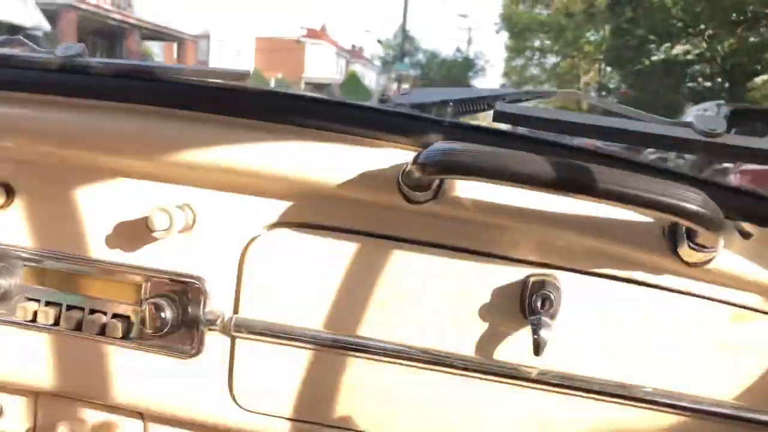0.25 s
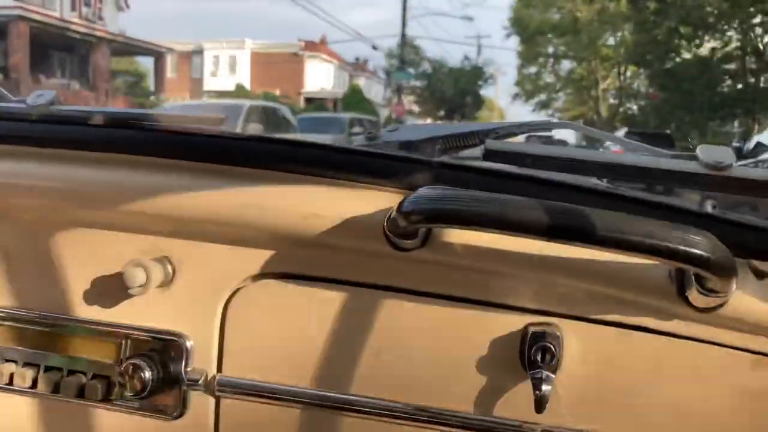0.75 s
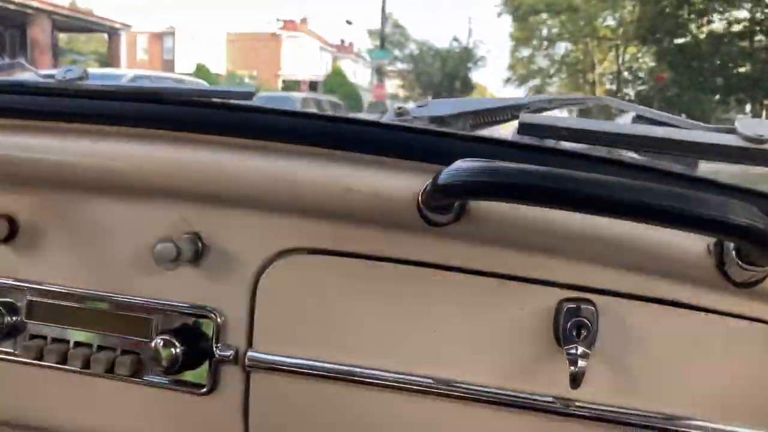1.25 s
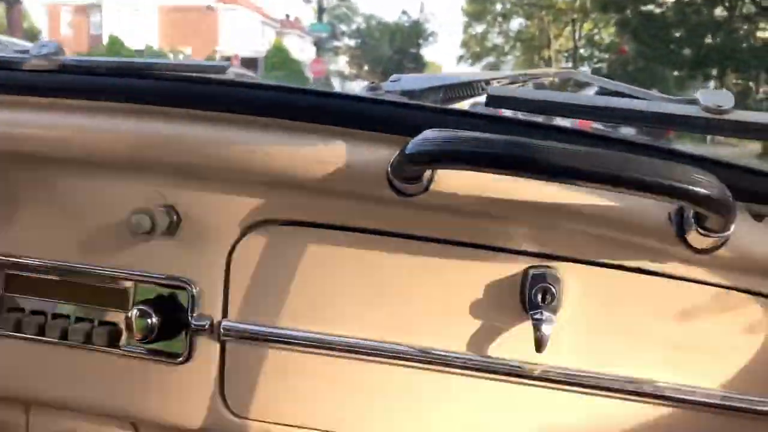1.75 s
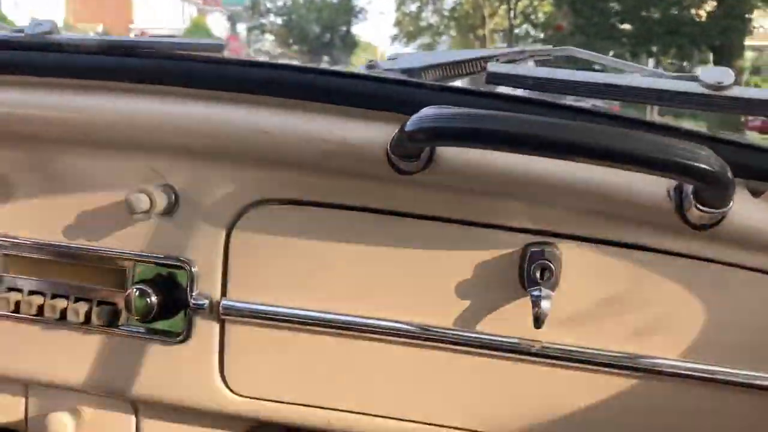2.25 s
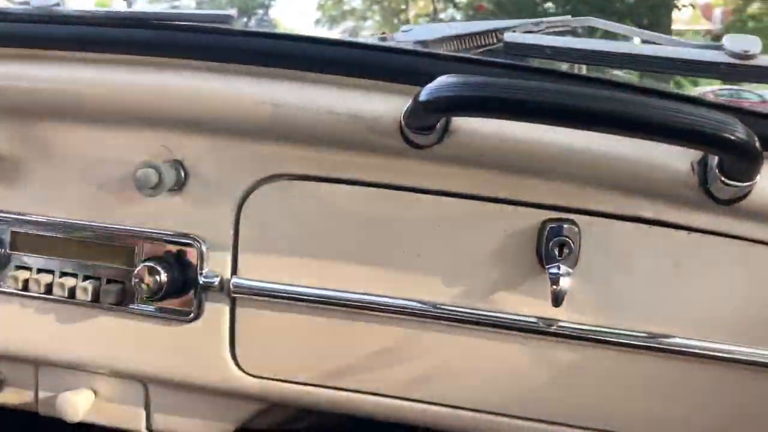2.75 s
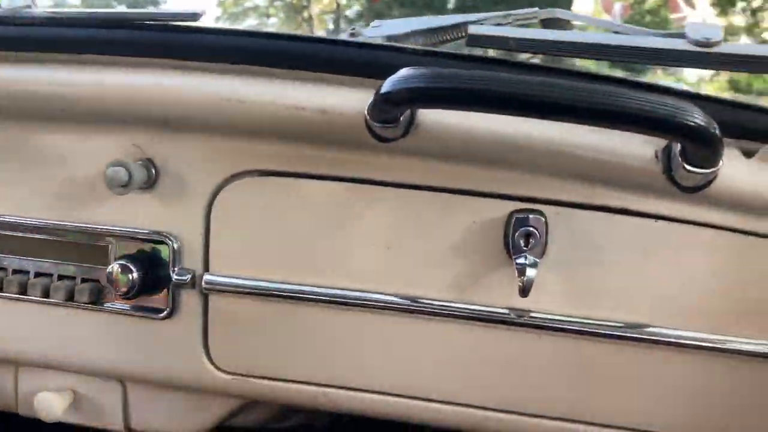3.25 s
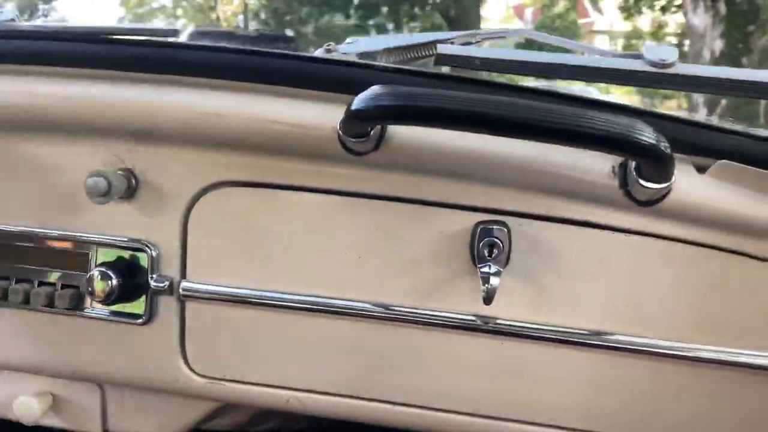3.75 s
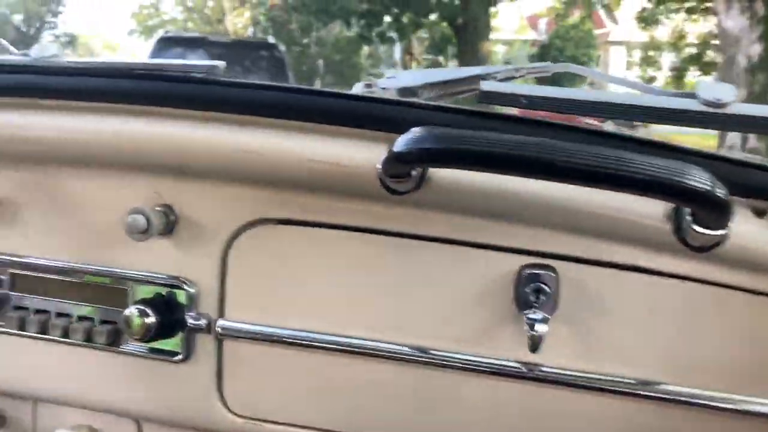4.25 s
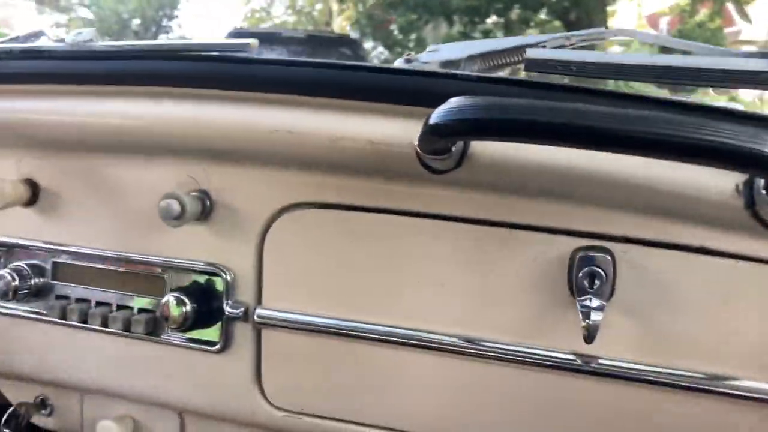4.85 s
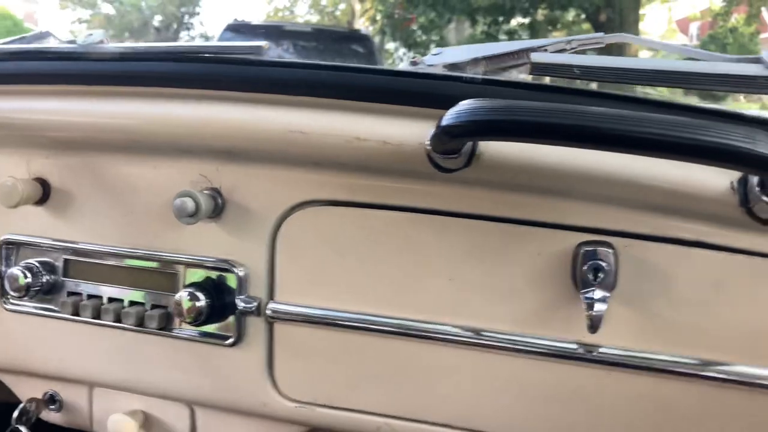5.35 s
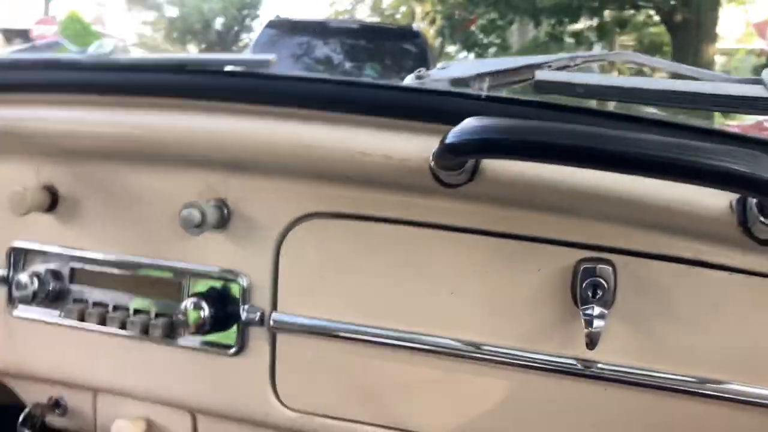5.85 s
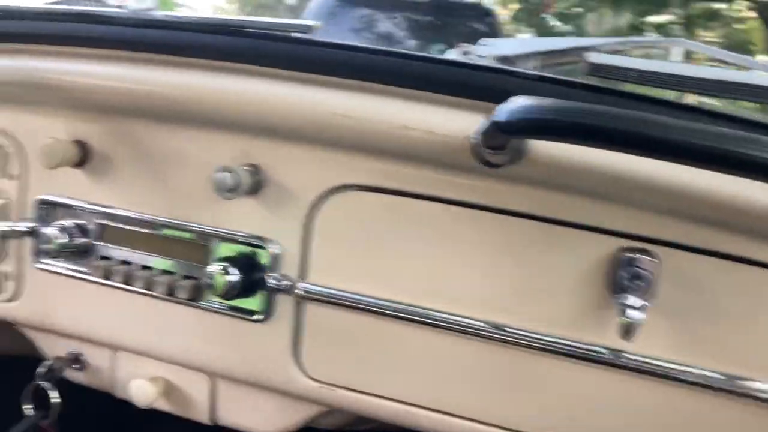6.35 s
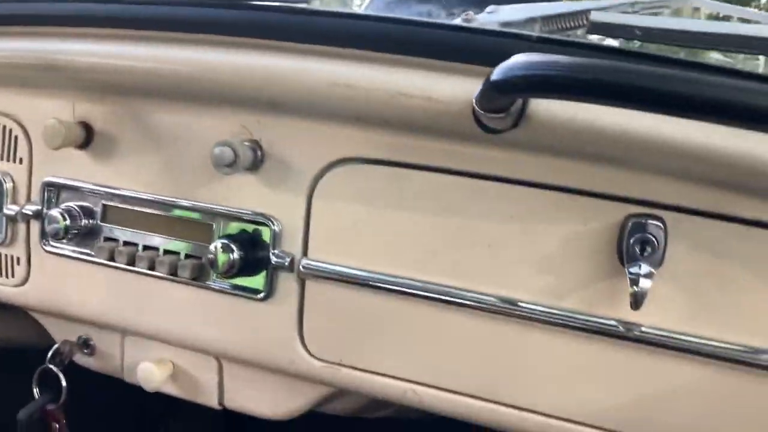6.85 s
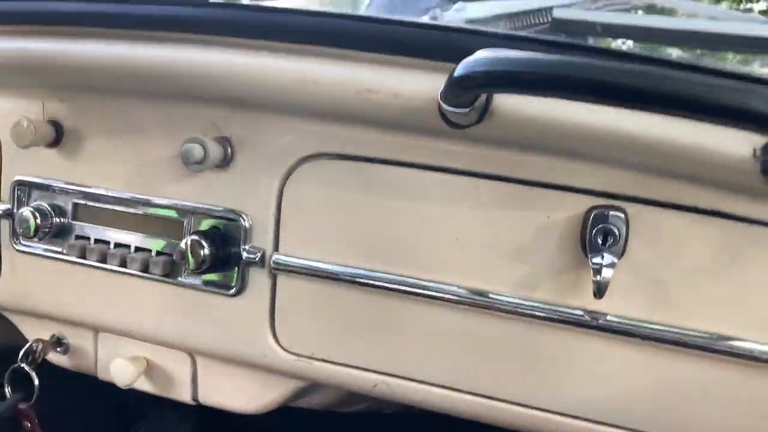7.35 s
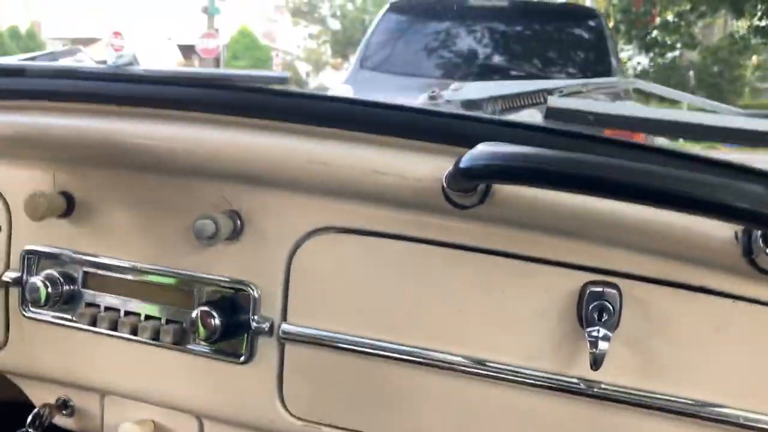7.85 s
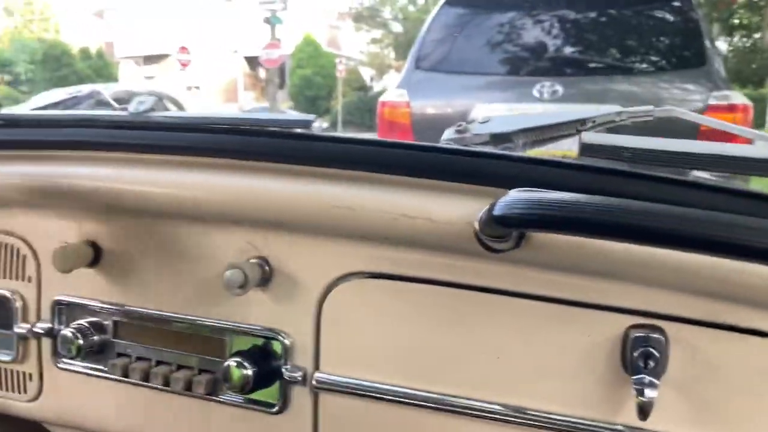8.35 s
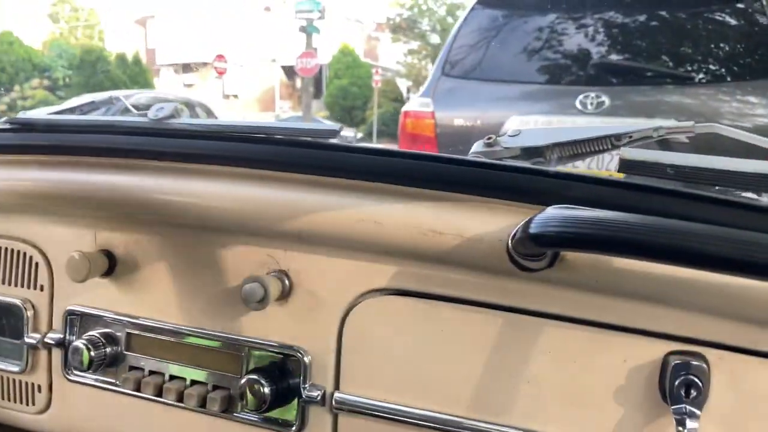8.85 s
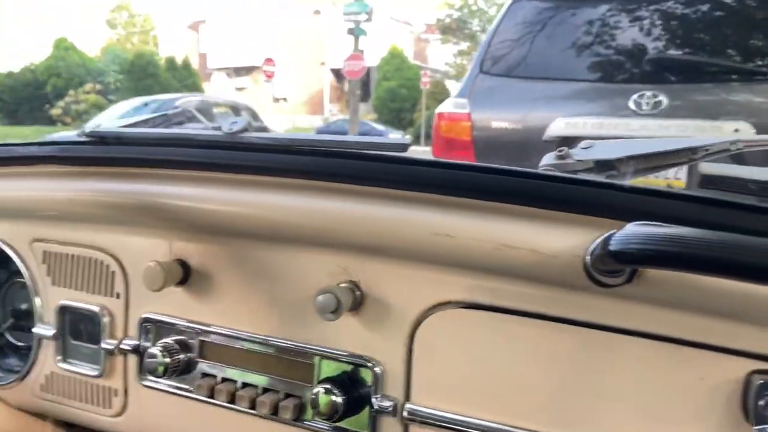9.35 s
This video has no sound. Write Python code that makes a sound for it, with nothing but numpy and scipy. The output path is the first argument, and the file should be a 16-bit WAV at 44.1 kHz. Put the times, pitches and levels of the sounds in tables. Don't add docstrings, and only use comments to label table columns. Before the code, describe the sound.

Close cabin sound of a vintage car rolling to a crawl: boomy engine throb, tinny clatter, rushing fan, rattling trim, a few dull knocks.

```python
import sys
import numpy as np
from scipy import signal
from scipy.fft import rfft, irfft, next_fast_len
from scipy.io import wavfile
from scipy.ndimage import uniform_filter1d, map_coordinates

SR = 44100
rng = np.random.default_rng(int(sys.argv[2]) if len(sys.argv) > 2 else 0)


def gain_from_decibels(decibels):
    exponent = np.asarray(decibels, float) / 20
    return 10 ** exponent


def inscribe(sig):
    pcm = np.round(np.clip(np.atleast_2d(sig).T, -1, 1) * 32767)
    wavfile.write(sys.argv[1], SR, pcm.astype(np.int16))


N = 422919

# time in seconds, roughness in dB.
ROUGHNESS = [(0, -16), (1.4, -13), (2.3, -15.5), (2.9, -16.5), (3.6, -19), (4.8, -22), (6.2, -28),
             (7.2, -26), (8, -26), (9, -21.5), (9.59, -19.5)]
# time in seconds, half length in seconds, rise in dB.
PARKED_CARS = [
    (1.1, 0.38, 2.5),
    (2.2, 0.37, 4),
    (5.75, 0.33, 2),
]


def unit(x):
    return x / np.sqrt(np.mean(x ** 2) + 1e-20)


def along(points, hz):
    f, v = np.transpose(points)
    return np.interp(np.log(hz + 1), np.log(f + 1), v)


def curves(rows):
    s, *cols = np.transpose(rows)
    return [np.interp(np.arange(N) / SR, s, c) for c in cols]


def wobble(rate):
    knots = rng.standard_normal(int(N * rate / SR) + 4)
    return map_coordinates(knots, [np.arange(N) * rate / SR])


def swells(rows, column=2):
    t = np.arange(N) / SR
    return sum(row[column] * np.exp(-((t - row[0]) / row[1]) ** 2) for row in rows)


def filtered(x, response):
    m = next_fast_len(N + SR // 2)
    return irfft(rfft(x, m) * response(np.fft.rfftfreq(m, 1 / SR)), m)[..., :N]


def modes(table):
    def response(f):
        total = 0
        for k, (centre, width, db) in enumerate(table):
            damping = 1j * f * width
            total = total + (-1) ** k * gain_from_decibels(db) * damping / (centre * centre - f * f + damping)
        return total
    return response


def noise_pair(patchy_db):
    z = signal.stft(rng.standard_normal((2, N)), nperseg=512)[2]
    field = uniform_filter1d(rng.standard_normal(z.shape[1:]), size=8, axis=0)
    field = uniform_filter1d(field, size=10, axis=1)
    return signal.istft(z * gain_from_decibels(patchy_db * unit(field)), nperseg=512)[1][:, :N]


def throb(cycle, depth_db, start):
    beats = zip((1, 2, 4), depth_db)
    return gain_from_decibels(sum(d * np.cos(2 * np.pi * (k * cycle + start)) for k, d in beats))


def jolt():
    jolt_s, half_s = 0.11, 0.13
    return swells([(jolt_s, half_s, 1)])


def answer_db(layer, cycle_hz):
    answers = {"drone": (-36.5, 0.23, 0.1, 9.5, 5), "tinware": (-33.5, 0.0437, 2.1, 2, -2.5),
               "fan": (-43.5, 0.1218, 1.04, 6, 3), "trim": (-61, .5, 1.1, 10.5, 4.5),
               "door": (-51.5, 0.02, -2, 0, -2), "lid": (-50, 0.31, 3, 2, 9)}
    still_db, cruise_hz = -28, 19.2
    pull_s, pull_rise_s = 9.22, 0.25
    level_db, road_share, rev_share, jolt_db, pull_db = answers[layer]
    road_db = road_share * (uniform_filter1d(curves(ROUGHNESS)[0], size=SR) - still_db)
    rev_db = rev_share * 20 * np.log10(cycle_hz / cruise_hz)
    pull = 1 / (1 + np.exp((pull_s - np.arange(N) / SR) / pull_rise_s))
    return level_db + road_db + rev_db + jolt_db * jolt() + pull_db * pull


def engine_speed():
    # time in seconds, cycle rate in Hz.
    speed = [(0, 19.1), (2, 19.16), (3.6, 19.19), (4.2, 19.1), (4.8, 19.25), (5.3, 19.15), (5.8, 19.3),
             (6.95, 19.4), (7.15, 19.3), (7.3, 18.75), (7.7, 16.5), (7.9, 15.75), (8.1, 15.38),
             (8.4, 15.15), (8.55, 15.7), (9, 18.5), (9.2, 19.12), (9.4, 19.2)]
    return curves(speed)[0]


def exhaust(cycle, cycle_hz):
    # multiple of the cycle, level in dB, unsteadiness in dB.
    orders = [(2, -24.5, 1.3), (3, -40, 2), (4, -20, .5), (5, -32.5, 1), (6, -25, .8), (7, -29, 1),
              (8, -27, .6), (9, -34, 2), (10, -35, 3), (11, -37, 3), (12, -34, 3)]
    # multiple of the cycle, level in dB, unsteadiness in dB.
    uneven = [(2.5, -37, 2), (4.5, -42, 2), (5.5, -38, 1.5), (6.5, -41, 2), (7.5, -37, 1.5),
              (8.5, -38, 1.5), (10.5, -35.5, 1.5), (11.5, -33, 1.5), (13.5, -33.5, 1), (14, -36, 1.5),
              (14.5, -34.5, 1), (17, -39, 1)]
    # frequency in Hz, boost in dB.
    cabin = [(30, -11), (38, 0), (61, -5), (77, 1), (92, 0), (108, -6), (123, -5), (138, -4), (154, 0),
             (173, -4), (192, -11), (215, -14), (260, -16)]
    # time in seconds, firing strength in dB.
    load = [(0, -2), (1.2, -10.5), (2, -6), (3, -5), (3.7, -0.5), (4.5, -1), (5.5, 0), (7, 0.1),
            (7.6, -1.5), (8.7, -0.5), (9, -1.5), (9.3, -1.5)]
    tone = 0
    for k, db, sway_db in orders + uneven:
        start = rng.random() if k % 1 else .49 + .026 * k ** 2
        turn = start + .015 * sway_db * wobble(7)
        size = gain_from_decibels(db + along(cabin, k * cycle_hz) + sway_db * wobble(6.3))
        tone = tone + size * np.cos(2 * np.pi * (k * cycle + turn))
    return np.sqrt(2) * gain_from_decibels(curves(load)[0]) * tone * gain_from_decibels([[1.05], [-1.05]])


def drone(cycle, level_db):
    # frequency in Hz, level in dB per Hz.
    hum = [(110, -32), (185, -9), (221, -1), (301, -12.5), (329, -11.5), (371, -12), (460, -9.5), (520, -9),
           (583, -13.5), (640, -14.5), (830, -52), (1410, -120)]
    shake = noise_pair(patchy_db=0.5) * throb(cycle, depth_db=(.6, 1.5, 1.5), start=0.27)
    return gain_from_decibels(level_db - 1.5) * unit(filtered(shake, lambda f: gain_from_decibels(along(hum, f))))


def tinware(cycle, level_db):
    # frequency in Hz, width in Hz, level in dB.
    shrouds = [(667.7, 20.7, 2), (789, 23.7, 2), (816, 12.4, -1), (914.7, 31, 5), (972, 16.4, 3),
               (1052, 38.6, 4.5), (1330, 80, -4), (1660, 60, -32)]
    repeat_share, steps = .45, 4096
    angle = (cycle / 2 + .0012 * wobble(5)) % 1 * steps
    patterns = irfft(np.exp(2j * np.pi * rng.random((2, steps // 2 + 1))))
    same = np.array([unit(map_coordinates(row, [angle], mode="grid-wrap")) for row in patterns])
    fresh = unit(noise_pair(patchy_db=.3))
    clatter = np.sqrt(repeat_share) * same + np.sqrt(1 - repeat_share) * fresh
    blows = clatter * throb(cycle, depth_db=(1.1, 1.4, .8), start=0.22)
    ringing = filtered(blows, lambda f: modes(shrouds)(f) / (1 + (f / 1250) ** 6))
    return gain_from_decibels(level_db + 0.3) * unit(ringing)


def fan(cycle, level_db):
    # frequency in Hz, level in dB per Hz.
    rush_shape = [(500, -48), (700, -23), (1100, -12.5), (1300, -1), (1700, 0.5), (2300, -4), (3000, -8.5),
                  (3500, -5.5), (4100, -8), (4900, -15), (5500, -16.5), (6500, -17), (8000, -27),
                  (12000, -120)]
    # frequency in Hz, width in Hz, level in dB.
    gaps = [(2780, 90, -9), (2920, 90, 2), (3140, 80, -3), (4010, 80, 2), (4095, 45, 3)]
    # time in seconds, half length in seconds, rise in dB.
    sings = [
        (3.95, .35, 10),
        (5, .3, 5),
        (5.88, .2, 13),
    ]
    air = noise_pair(patchy_db=1.36) * throb(cycle, depth_db=(.4, 1.1, .5), start=0.28)
    knots = rng.standard_normal(600)

    def cabin_air(f):
        ripple_db = 1.6 * map_coordinates(knots, [f / 45])
        return gain_from_decibels(along(rush_shape, f) + ripple_db)
    rush = gain_from_decibels(0.26 * wobble(9.8)) * unit(filtered(air, cabin_air))
    whistle = unit(filtered(noise_pair(patchy_db=1.5), lambda f: abs(modes(gaps)(f)) ** 2))
    return gain_from_decibels(level_db + swells(PARKED_CARS) + 3.2) * (rush + gain_from_decibels(swells(sings) - 24) * whistle)


def panel(name, level_db):
    panels = {"door": (398, 16, 0), "lid": (522, 29, 0)}
    hum = filtered(noise_pair(patchy_db=1.5), lambda f: abs(modes([panels[name]])(f)) ** 2)
    return gain_from_decibels(level_db) * unit(hum)


def lever():
    # time in seconds, peak in dB, pitch in Hz, 60 dB decay in seconds.
    knocks = [(.029, -14, 200, 0.073), (.06, -11, 270, 0.11), (.105, -18, 470, .09), (.14, -21, 556, 0.056),
              (0.171, -15, 257, 0.18), (.205, -13, 292, 0.047), (.372, -13, 587, 0.032),
              (.374, -12.5, 380, 0.058), (0.379, -9, 242, 0.062), (.527, -23, 960, 0.06),
              (6.318, -18, 406, 0.09), (6.332, -15.5, 419, 0.14), (6.345, -10, 423, 0.054),
              (6.461, -20, 440, 0.057), (6.466, -22, 586, 0.045), (6.467, -33, 1300, .03),
              (6.695, -13, 399, 0.075), (6.719, -16, 413, 0.074)]
    out, t = np.zeros((2, N + SR)), np.arange(SR // 3) / SR
    soft = signal.butter(2, 1600, fs=SR, output="sos")
    for s, db, hz, t60 in knocks:
        partials_hz = hz * np.array([[.62], [.9], [1], [1.17], [1.36]])
        ring = np.dot([0.5, 0.15, 1.25, 0.38, 0.086], np.sin(2 * np.pi * partials_hz * t))
        crack = gain_from_decibels(-60 * t / 0.012) * signal.sosfilt(soft, rng.standard_normal(len(t)))
        envelope = gain_from_decibels(db - 60 * t / t60) * (1 - np.exp(-t / 0.0035))
        out[:, round(s * SR):][:, :len(t)] += envelope * (ring + crack) * gain_from_decibels([[-1.1], [1.1]])
    return out[:, :N]


def trim(cycle, level_db):
    # frequency in Hz, level in dB per Hz.
    rustle = [(4500, -120), (5500, 6), (7000, 8), (8500, 4), (11500, -13.5), (14500, -14.5), (15200, -19),
              (15800, -20.5)]
    # time in seconds, half length in seconds, rise in dB, brightening in dB.
    shakes = [(1.0, .1, 1.5, -1), (1.23, 0.034, 2.5, -2), (1.76, 0.052, 5, -4), (2.3, .3, 3.5, -2.5),
              (3.3, 0.086, 3, -1), (3.83, .09, 3.5, -0.5), (4.34, .1, 3.5, -0.5), (5.1, 0.1, 4, 1),
              (5.25, 0.035, -2, 7), (5.7, .08, 0.5, -1), (6.0, 0.067, 4, 4), (6.7, .025, 9, -8),
              (7.24, 0.024, 6, 2.5), (7.9, .06, 2.5, 5), (8.3, 0.087, 2.5, 3), (8.73, .025, 6, -3),
              (9.19, .08, 1.5, .3)]
    level_db = level_db + swells(shakes)
    bright_db = -4.5 + swells(shakes, column=3)
    grains = gain_from_decibels(1.35 * wobble(300) + 0.24 * wobble(18))
    grains = grains * throb(cycle, depth_db=(.3, 1.2, .3), start=0.34)
    hiss = filtered(grains * noise_pair(patchy_db=1.7), lambda f: gain_from_decibels(along(rustle, f)))
    low = filtered(hiss, lambda f: 1 / (1 + (f / 9800) ** 12))
    return gain_from_decibels(level_db + 2.0) * (unit(low) + gain_from_decibels(bright_db + 5.5) * unit(hiss - low))


def ticks(events, spread, gain_db):
    out, t = np.zeros((2, N + SR)), np.arange(SR // 12) / SR
    for s, db, hz, t60 in events:
        edges_hz = [hz / spread, min(hz * spread, 14500)]
        band = signal.butter(2, edges_hz, "bandpass", fs=SR, output="sos")
        burst = unit(signal.sosfilt(band, rng.standard_normal((2, len(t)))))
        envelope = gain_from_decibels(db + gain_db - 60 * t / t60) * (1 - np.exp(-t / 0.0011))
        out[:, round(s * SR):][:, :len(t)] += envelope * burst
    return out[:, :N]


def trim_ticks():
    # time in seconds, peak in dB.
    contacts = [(0.036, -31), (0.0653, -40), (0.0907, -34), (0.1151, -27.5), (0.173, -29), (0.23, -31),
                (0.2603, -36), (0.3237, -36), (0.3571, -46), (0.4279, -43), (0.7726, -44), (1.501, -45),
                (1.6741, -36), (1.7389, -37), (2.9412, -36), (4.4468, -37), (5.6685, -38), (8.7306, -42)]
    tick_hz, tick_t60 = 10600, .03
    return ticks([(s, db, tick_hz, tick_t60) for s, db in contacts], spread=1.33, gain_db=4)


def key_ring():
    # time in seconds, peak in dB, pitch in Hz, 60 dB decay in seconds.
    keys = [(0.0218, -27, 3600, 0.025), (0.0458, -24, 3400, 0.024), (0.1386, -18.5, 3700, 0.03),
            (.171, -31, 3200, .025), (0.2094, -25, 3600, 0.022), (0.2304, -36, 3400, 0.027),
            (.2628, -29, 3060, 0.023), (.2952, -36, 3270, .025), (.3247, -35, 3100, .025),
            (6.6927, -34, 3300, 0.037)]
    # time in seconds, peak in dB, pitch in Hz, 60 dB decay in seconds.
    chinks = [
        (.123, -29, 4740, .035),
        (.1386, -25, 4800, .035),
        (.2094, -31, 4800, .025),
        (6.6927, -35, 5000, .03),
    ]
    return ticks(keys, spread=1.45, gain_db=-1) + ticks(chinks, spread=1.08, gain_db=0)


def road():
    # frequency in Hz, level in dB per Hz.
    rumble_shape = [(12, -30), (24, -20), (34, 2), (48, -4.5), (60, -5.5), (74, -0.5), (88, 0.5),
                    (103, -8.5), (125, -8.5), (160, -10), (200, -19), (260, -26), (400, -39.5), (700, -120)]
    # frequency in Hz, width in Hz, level in dB.
    tread = [(3900, 2600, 0)]
    # time in seconds, half length in seconds, rise in dB.
    seams = [
        (.42, 0.02, 2.5),
        (.7, 0.14, 1.5),
        (2.6, 0.14, -0.5),
        (4.1, .17, -0.5),
    ]
    level_db = curves(ROUGHNESS)[0] + swells(seams) + 6.2 * jolt()
    rumble = filtered(noise_pair(patchy_db=.4), lambda f: gain_from_decibels(along(rumble_shape, f)))
    rumble = unit(gain_from_decibels(.4 * wobble(8)) * rumble)
    calm_db = uniform_filter1d(level_db, size=SR // 2)
    hiss = unit(filtered(noise_pair(patchy_db=3), lambda f: abs(modes(tread)(f)) ** 2))
    return gain_from_decibels(level_db) * rumble + gain_from_decibels(calm_db + swells(PARKED_CARS) - 35) * hiss


def ports(pair):
    # frequency in Hz, left-right likeness, radians the right leads, left minus right in dB.
    cabin_pair = [(60, .98, 0, 2.1), (170, .96, 0, 2.8), (250, .85, 0, -1.8), (400, .55, .2, -.5),
                  (530, .65, .9, 4.5), (680, .6, -.2, 0), (790, .55, -2.5, -3.5), (920, .87, 1.2, -1),
                  (1070, .82, .5, 4.8), (1300, .35, 2, .5), (2200, .5, 4.2, 1), (3700, .35, 9, 1),
                  (4200, .35, 12.5, 1.2), (5200, .3, 12.6, 1.8), (5600, .4, 10, .5), (6400, .45, 9.5, 0),
                  (7300, .9, 9.4, 0)]
    lag_s = 13 / SR

    def column(k, f):
        return along([(row[0], row[k]) for row in cabin_pair], f)

    def side(sign):
        def response(f):
            turn = np.arccos(np.clip(column(1, f), 0, 1)) / 2 * (f < 7300)
            lead = np.where(f > 6350, 2 * np.pi * (.375 - f * lag_s), column(2, f))
            gain = gain_from_decibels(sign * column(3, f) / 2) * np.exp(-.5j * sign * lead)
            return gain * [np.cos(turn), sign * np.sin(turn)]
        return filtered(pair, response).sum(0)
    return np.array([side(0.94), side(-1.066)])


def scene():
    cycle_hz = engine_speed()
    cycle = np.cumsum(cycle_hz) / SR
    engine_bay = drone(cycle, answer_db("drone", cycle_hz))
    engine_bay = engine_bay + tinware(cycle, answer_db("tinware", cycle_hz))
    engine_bay = engine_bay + fan(cycle, answer_db("fan", cycle_hz))
    panels = panel("door", answer_db("door", cycle_hz)) + panel("lid", answer_db("lid", cycle_hz))
    loose = trim(cycle, answer_db("trim", cycle_hz)) + trim_ticks() + key_ring()
    return exhaust(cycle, cycle_hz) + ports(engine_bay + panels + loose + road()) + lever()


def low_pass(x):
    return signal.sosfilt(signal.butter(12, 15750, fs=SR, output="sos"), x)


def record(dry):
    x = signal.sosfilt(signal.butter(1, 12, "highpass", fs=SR, output="sos"), dry)
    x = x / (1 + abs(x / .93) ** 6) ** (1 / 6)
    return low_pass(x)


dry = scene()
out = record(dry)
inscribe(out)
```